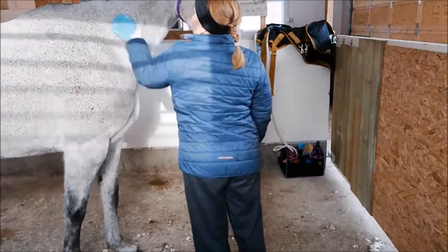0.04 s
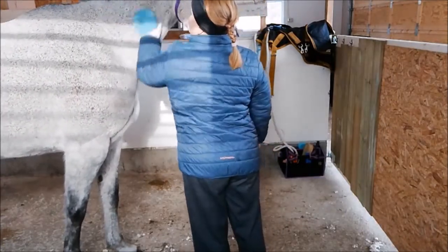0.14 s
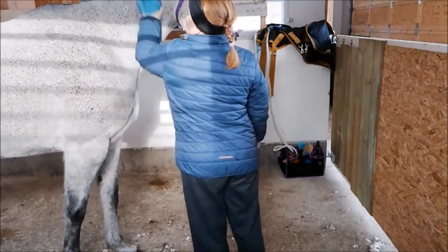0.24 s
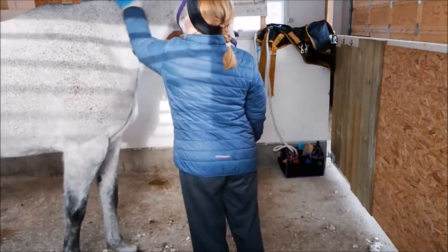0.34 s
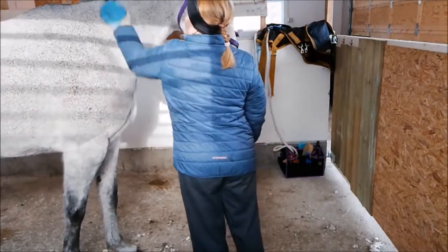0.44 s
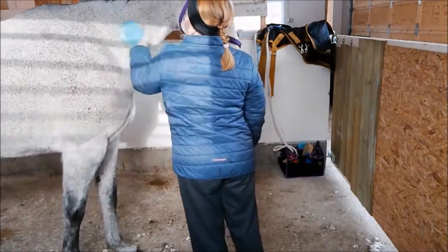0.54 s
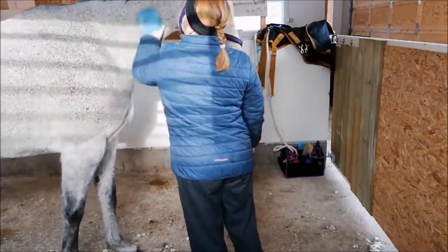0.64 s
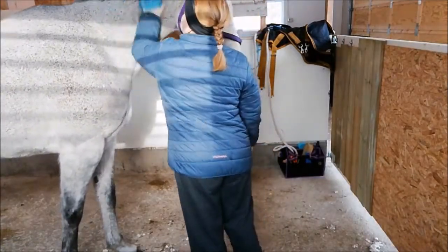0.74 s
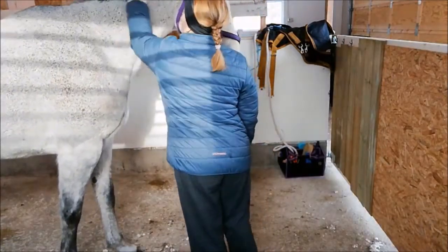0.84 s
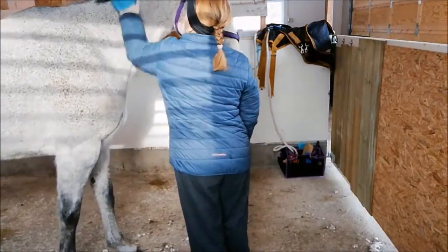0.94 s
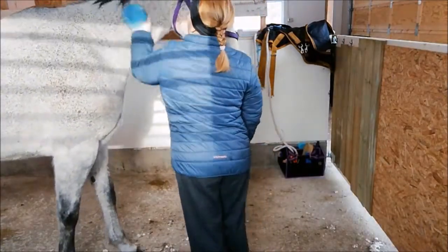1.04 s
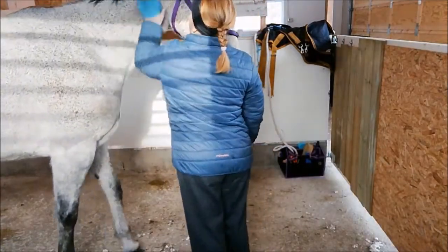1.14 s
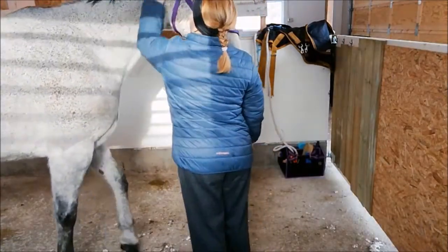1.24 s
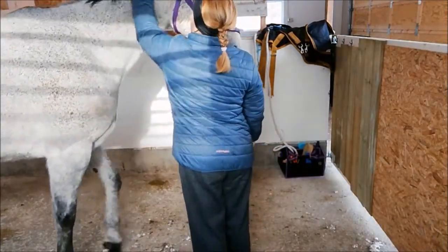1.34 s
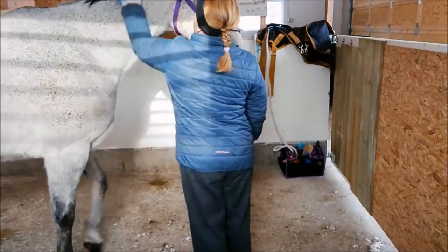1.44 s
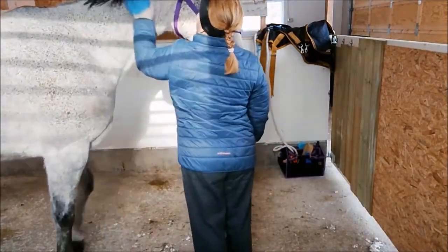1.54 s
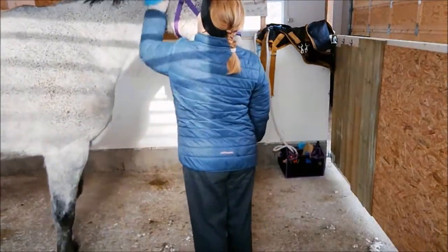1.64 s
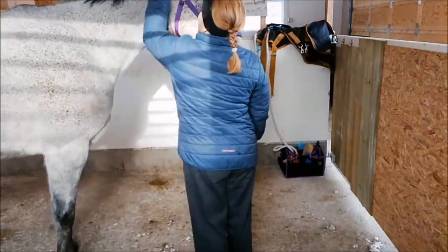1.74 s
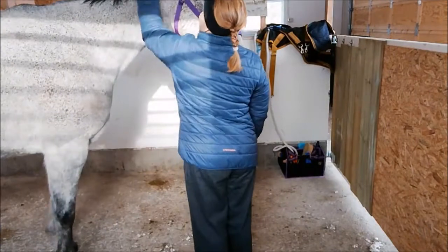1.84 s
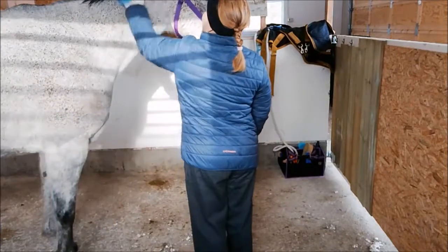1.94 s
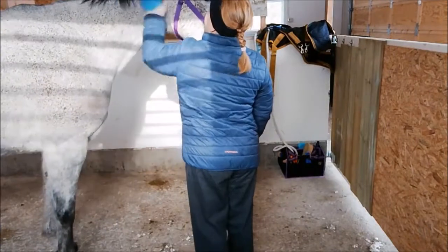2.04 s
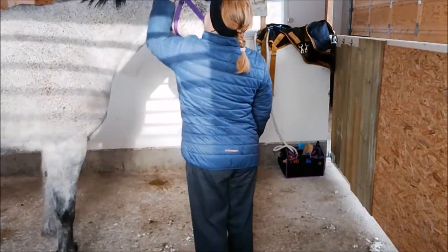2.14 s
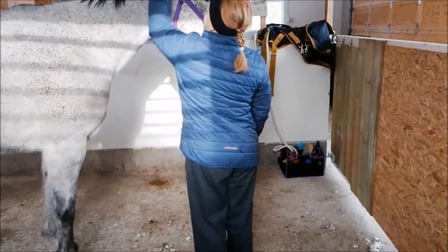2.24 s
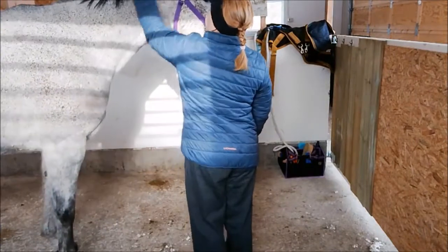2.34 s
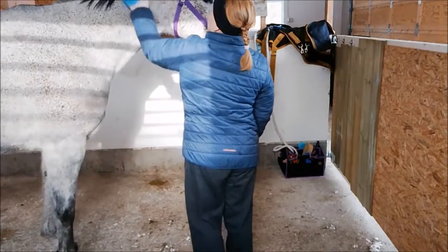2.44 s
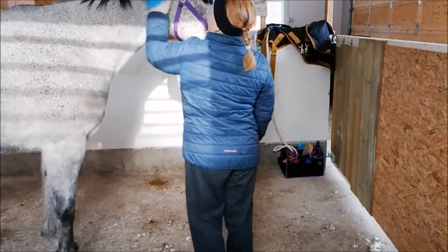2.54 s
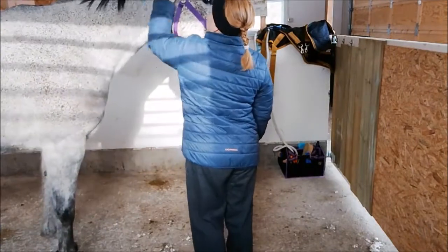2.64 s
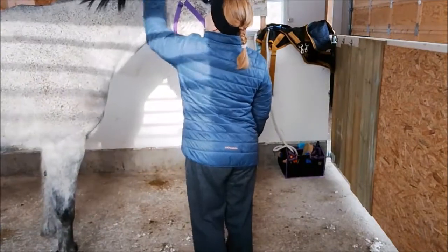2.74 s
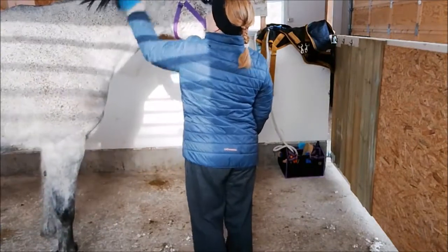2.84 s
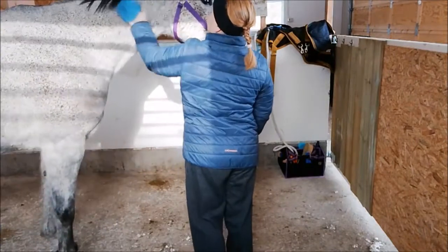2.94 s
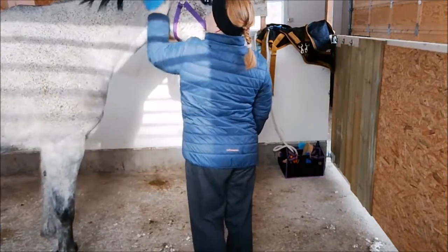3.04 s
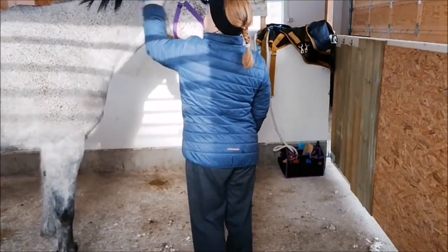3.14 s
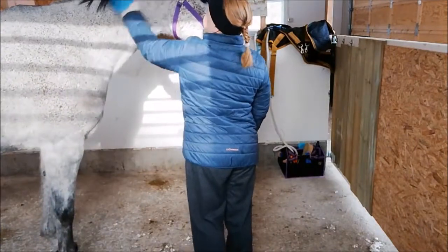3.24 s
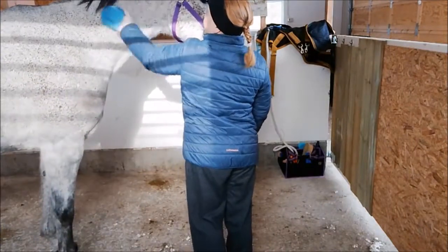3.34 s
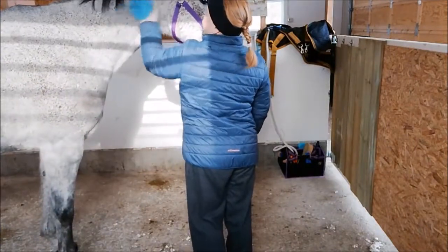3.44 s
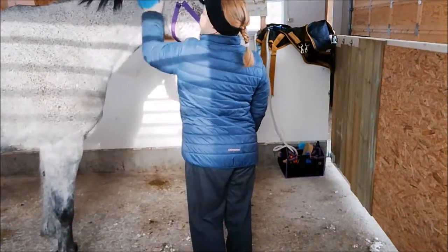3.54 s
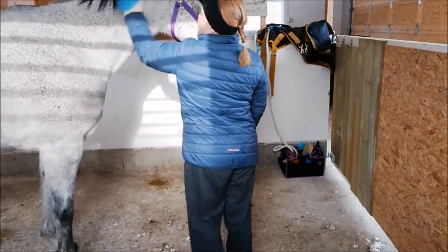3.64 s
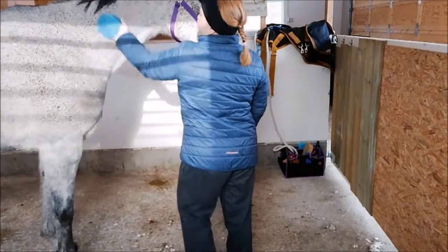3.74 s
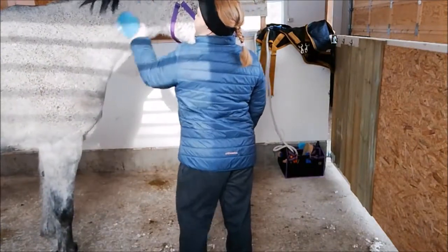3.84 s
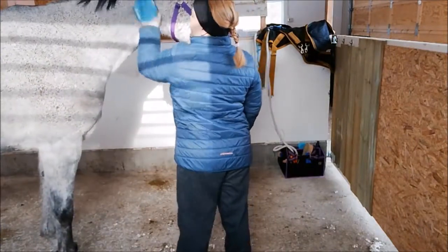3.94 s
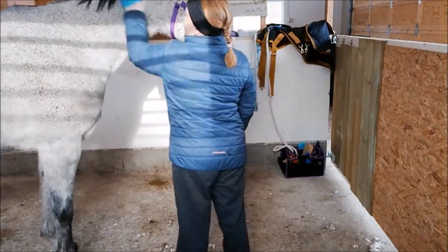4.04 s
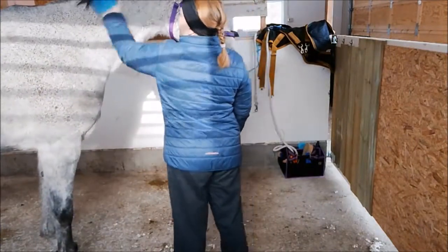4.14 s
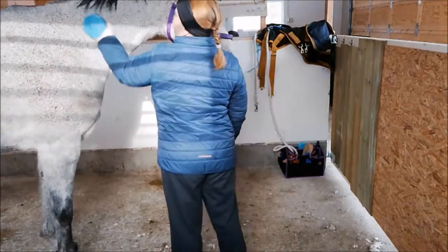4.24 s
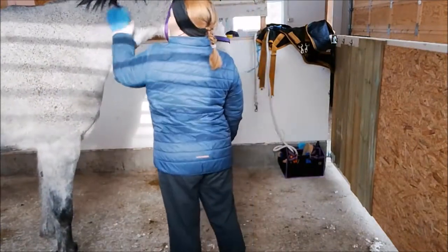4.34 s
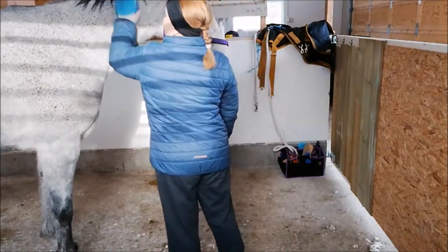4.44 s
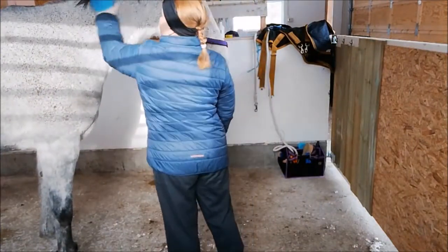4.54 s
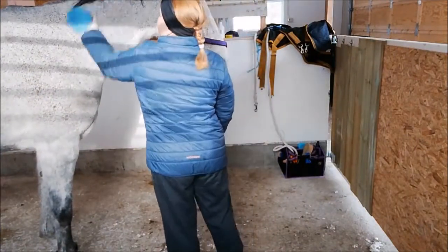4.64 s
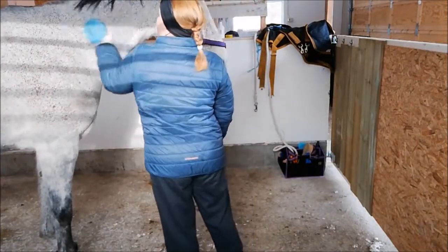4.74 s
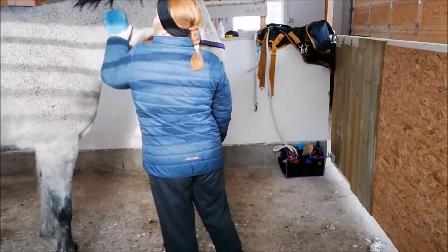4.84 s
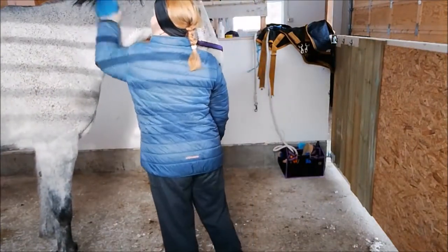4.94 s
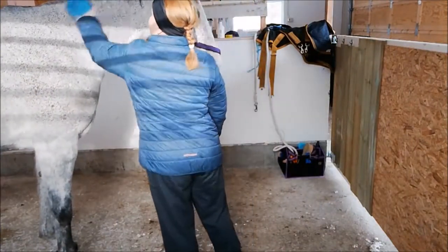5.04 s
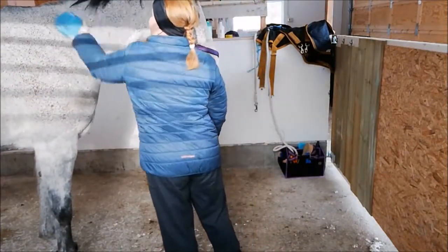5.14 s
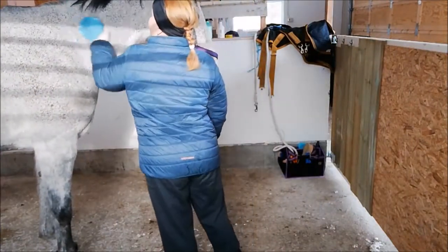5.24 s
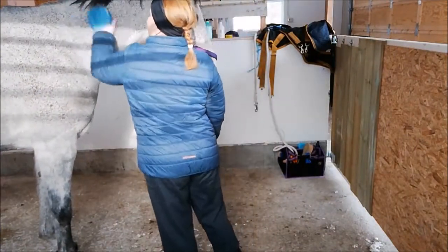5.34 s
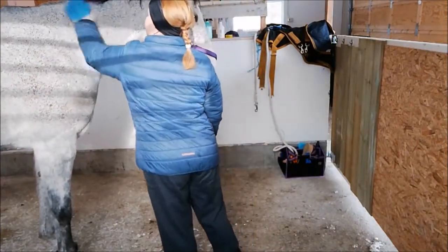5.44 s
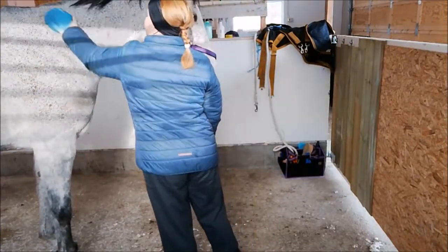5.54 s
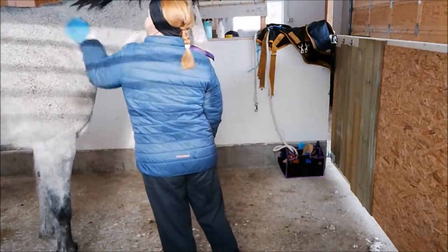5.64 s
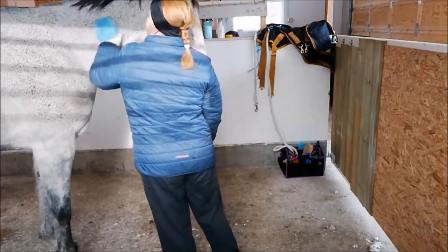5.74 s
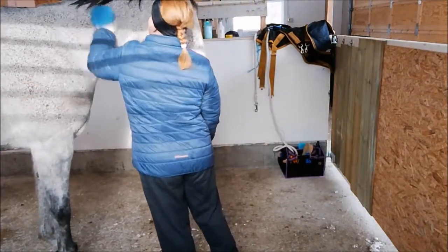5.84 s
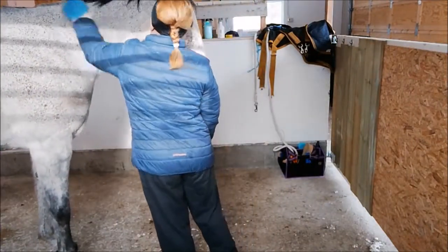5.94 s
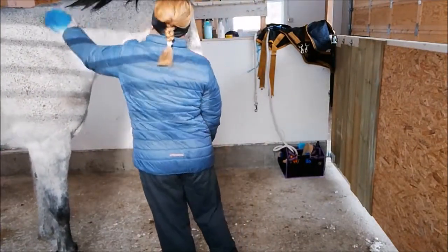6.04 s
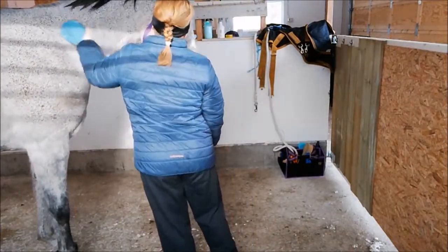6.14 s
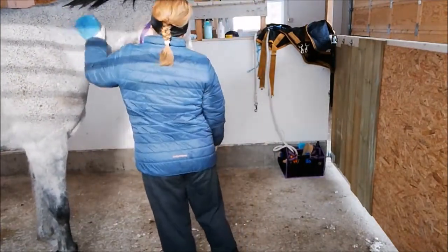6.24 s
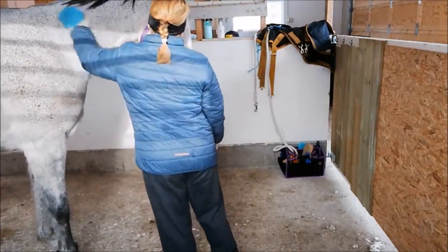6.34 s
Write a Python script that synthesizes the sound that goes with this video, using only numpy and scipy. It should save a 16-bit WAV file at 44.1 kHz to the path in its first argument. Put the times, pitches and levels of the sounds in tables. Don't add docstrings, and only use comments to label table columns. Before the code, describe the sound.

In a quiet stable, quiet hissing brush strokes continue steadily; early on, a hoof scrapes over grit and lands with a booming thud.

```python
import sys
import numpy as np
from scipy import signal
from scipy.fft import rfft, irfft, next_fast_len
from scipy.io import wavfile
from scipy.ndimage import uniform_filter1d, map_coordinates

SR = 44100
rng = np.random.default_rng(int(sys.argv[2]) if len(sys.argv) > 2 else 0)


def wav_out(sig):
    wavfile.write(sys.argv[1], SR, np.round(np.clip(np.atleast_2d(sig).T, -1, 1) * 32767).astype(np.int16))


def field_ratio(decibels):
    return 10 ** (np.asarray(decibels, dtype=float) / 20)


N = 281358


def unit(x):
    return x / np.sqrt(np.mean(x ** 2) + 1e-20)


def along(points, hz):
    f, value = np.transpose(points)
    return np.interp(np.log(hz + 1), np.log(f + 1), value)


def wobble(rate):
    knots = rng.standard_normal(int(N * rate / SR) + 4)
    return map_coordinates(knots, [np.arange(N) * rate / SR])


def filtered(x, response):
    m = next_fast_len(x.shape[-1] + 8192)
    hz = np.fft.rfftfreq(m, 1 / SR)
    return irfft(rfft(x, m) * response(hz), m)[..., :x.shape[-1]]


def coloured(x, spectrum):
    return unit(filtered(x, lambda hz: field_ratio(along(spectrum, hz))))


# (f/Hz, likeness from -1 to 1)
ALIKE = [(60, .92), (130, .95), (290, .75), (640, -.37), (1100, .2), (1800, 0), (16000, 0)]


def spread(pair):
    def mid_and_side(hz):
        angle = np.arccos(np.clip(along(ALIKE, hz), -1, 1)) / 2
        return np.array([np.cos(angle), np.sin(angle)])

    mid, side = filtered(pair, mid_and_side)
    return np.array([mid + side, mid - side])


def slips(spiky_db, patchy_db, channels=2):
    size = field_ratio(spiky_db * wobble(700))
    z = signal.stft(size * rng.standard_normal((channels, N)), nperseg=512)[2]
    patches = uniform_filter1d(rng.standard_normal(z.shape[1:]), size=5, axis=0)
    patches = uniform_filter1d(patches, size=12, axis=1)
    return signal.istft(z * field_ratio(patchy_db * unit(patches)), nperseg=512)[1][:, :N]


def dying(life, seconds):
    noise = rng.standard_normal((2, round(seconds * SR)))
    hz, t, z = signal.stft(noise, SR, nperseg=256)
    fade = field_ratio(-60 * t / along(life, hz)[:, None])
    return spread(signal.istft(z * fade, SR, nperseg=256)[1])


def ring(modes, t):
    return sum(field_ratio(db - 60 * t / t60) * np.sin(2 * np.pi * hz * t) for hz, db, t60 in modes)


def onset(t, rise_s):
    return (1 - np.exp(-t / rise_s)) ** 2


# (f/Hz, level/dB)
AIR = [(59, -16), (100, -5), (177, -4), (265, -4), (347, -10.5), (433, -13), (790, -14), (1100, -8),
       (1430, -33.5), (2420, -120)]
# (f/Hz, level/dB)
SWAY = [(12, -35), (20, 1), (54, 4.5), (107, -10), (120, -8), (160, -36), (260, -120)]
# (f/Hz, level/dB)
HISS = [(590, -44), (1000, -17.5), (1480, 2.5), (1760, -10.5), (5170, -7), (10200, -23), (15700, -19)]
# (t/s, width/s, level/dB)
LURCH = (6.9, 0.12, 8)


def air():
    rumble_db, murmur_db, mic_hiss_db = -75.5, -73.5, -66.5
    stir = slips(spiky_db=0.75, patchy_db=3.0)
    lurch_s, width_s, lurch_db = LURCH
    swell_db = lurch_db * np.exp(-((np.arange(N) / SR - lurch_s) / width_s) ** 2)
    rumble = field_ratio(rumble_db + swell_db + 1.9 * wobble(6)) * coloured(stir, SWAY)
    murmur = field_ratio(murmur_db + 2.2 * wobble(6.5)) * coloured(stir, AIR)
    return spread(rumble + murmur + field_ratio(mic_hiss_db) * coloured(stir, HISS))


# (f/Hz, t60/s)
WALLS = [(120, 0.43), (400, 0.252), (1200, 0.275), (4000, .18), (10000, 0.12)]


def walls(x):
    tail = dying(WALLS, 0.7)
    late = np.pad(x, (400, 0))[None]
    return signal.fftconvolve(late, tail / np.linalg.norm(tail[0]), axes=1)[:, :N]


# (t/s, level/dB, f/Hz)
TICKS = [
    (.757, -37, 880),
    (1.348, -26, 1494),
    (1.359, -17, 813),
    (3.990, -35, 2130),
    (6.085, -55, 400),
]


def stones():
    out, t = np.zeros((2, N + SR)), np.arange(SR // 2) / SR
    for s, db, hz in TICKS:
        tones = [(hz, db, .02), (2.3 * hz, db - 6.0, .012)]
        out[:, round(s * SR):][:, :len(t)] += onset(t, 0.00048) * ring(tones, t)
    return out[:, :N]


# (t/s, thud level/dB, crack over thud/dB, floor boom over thud/dB)
STAMPS = [
    (1.27, -44, 8, -12),
    (1.352, -10.5, -4, 1.5),
    (1.455, -36, -7, -6),
    (1.947, -53, 0, 10),
]
# (f/Hz, level/dB, t60/s)
HOOF_MODES = [(194, 12.5, .05), (330, -4, .08)]
# (f/Hz, level/dB, t60/s)
FLOOR_MODES = [(131, -14.5, .4), (140, -1, 0.3), (165.9, -11.5, 0.46), (208, -14.5, 0.5),
               (255.3, -14.5, 0.3235), (284, -14.5, 0.29)]
# (f/Hz, level/dB)
BOARDS = [(30, -49), (60, -22.5), (110, -5), (200, 6.5), (340, -1), (420, -24), (600, -58.5)]
# (f/Hz, level/dB)
CRACK = [(240, -42.5), (400, -12), (775, -2.5), (1070, -8), (1370, -6.5), (2170, -17.5), (2650, -16),
         (3090, -20), (3550, -22.5), (15800, -56)]
# (f/Hz, t60/s)
CRACK_LIFE = [(60, 1), (200, 0.2), (400, 0.47), (1000, .5), (2000, 0.5), (4000, 0.3), (8000, 0.22)]


def stamps():
    out, t = np.zeros((2, N + SR)), np.arange(SR // 2) / SR
    right_lag_s = .0003
    late = np.array([t, t - right_lag_s])
    for s, db, crack_db, boom_db in STAMPS:
        rattle = dying(CRACK_LIFE, 1.0)[:, :len(t)]
        boom = ring(FLOOR_MODES, late) + field_ratio(-23.5) * coloured(rattle, BOARDS)
        thud = onset(t, 0.0032) * ring(HOOF_MODES, late)
        thud = thud + field_ratio(boom_db) * onset(t, 0.014) * boom
        snap = onset(t, 0.0024) * (1 + 0.53 * field_ratio(-60 * t / .1))
        crack = field_ratio(crack_db - 18.5) * snap * coloured(rattle, CRACK)
        out[:, round(s * SR):][:, :len(t)] += field_ratio(db) * (thud + crack)
    return out[:, :N]


# (start t/s, rise/s, hold/s, scrape level/dB, fade/dB a second)
DRAGS = [
    (.725, 0.11, .01, -31, 223),
    (0.978, 0.05, 0.045, -49, 157),
    (1.265, 0.0069, .02, -41, 146),
    (1.582, 0.02, 0.069, -38.5, 197),
    (1.94, .02, 0.011, -61.5, 250.5),
    (3.982, 0.0064, 0.045, -55, 216.5),
    (6.082, 0.0055, .04, -63, 246.5),
]
# (floor boom over scrape/dB, hoof drone/dB, grit/dB, share singing in horn)
WEIGHT = [(-24.5, -5.5, -7.5, .15), (-8, -2.5, 1, .5), (-13, -6, -6, .5), (-3, -5.5, 1.5, 1.2),
          (9.5, -7, -9.5, .4), (-12, -5.5, 8, .2), (-16, -10, -6.5, .4)]
# (f/Hz, width/Hz, level/dB)
HORN = [(457, 12, 18), (640, 39.84, -4), (870, 25, 4), (1087.5, 16.7, 19), (2065, 54, 8), (2670, 17, 2),
        (3830, 40, 9.5)]
# (f/Hz, level/dB)
SCRAPE = [(240, -43), (400, -20), (619, -2.5), (921, -7), (1060, -6.5), (1200, -6.5), (1900, -22),
          (2470, -46.5), (4180, -120)]
# (f/Hz, level/dB)
BOOM = [(29, -49), (50, -16), (75, -21.5), (113, 3), (170, -13), (220, -35), (370, -120)]
# (f/Hz, level/dB)
RUMBLE = [(94, -37.5), (160, -4.5), (210, 5.5), (370, 3), (404, -25), (450, -16.5), (580, -42), (990, -120)]
# (f/Hz, level/dB)
GRIT = [(1000, -38.5), (1700, -12), (2070, -4.5), (3300, -7.5), (4790, -9.5), (7280, -15), (9030, -33.5),
        (15100, -39), (15800, -39.5)]


def horn(hz):
    tones = (field_ratio(db) * 1j * hz * w / (c * c - hz * hz + 1j * hz * w) for c, w, db in HORN)
    return sum(tones) / 2


def drags():
    start, rise, hold, scrape_db, fade = np.transpose(DRAGS)[:, :, None]
    t = np.arange(N) / SR - start
    *over_db, sing = np.transpose(WEIGHT)
    boom, drone, grit = field_ratio(over_db)

    def slide(haste, lead=1):
        fading = haste * fade * np.clip(t - rise - hold, 0, 1)
        return np.clip(t / rise, 0, 1) ** lead * field_ratio(scrape_db - fading)

    push = slide(0.79)
    lean = slide(1, lead=.6)
    grind = spread(slips(spiky_db=2.0, patchy_db=1.53))
    singing = sing @ push / (push.sum(0) + 1e-9)
    crunch = grind + singing * filtered(grind, horn)
    layers = push.sum(0) * coloured(crunch, SCRAPE)
    layers += boom @ push * coloured(crunch, BOOM)
    layers += drone @ lean * coloured(crunch, RUMBLE)
    layers += grit @ slide(1.21) * coloured(crunch, GRIT)
    return field_ratio(0.68 * wobble(60)) * layers


# (t/s, level/dB, length/s)
FLICK = (6.083, -51, 0.069)
# (f/Hz, level/dB)
WHISK = [(2060, -43), (3500, -11.5), (5710, 2.5), (9730, -9), (14600, -10.5), (16000, -21)]


def flick():
    s, db, length = FLICK
    t = np.arange(N) / SR - s
    fade = field_ratio(-40 * np.clip(t, 0, 1) - 470 * np.clip(t - length, 0, 1))
    shape = np.clip(t / 0.0028, 0, 1) * fade
    return field_ratio(db) * shape * spread(coloured(slips(spiky_db=2.0, patchy_db=0.5), WHISK))


# (turn t/s, hiss level at turn/dB, rub level/dB, bristle hiss level/dB, coat resonance f/Hz)
OPENING = [(-0.02, -61, -67.5, -63, 1399), (0.09, -64, -61.5, -59, 1560), (0.3, -57, -66.5, -53.5, 1585),
           (0.54, -61, -62, -57.5, 1450), (0.96, -63, -57, -61.5, 1500), (1.21, -62, -57, -56, 1488),
           (1.45, -60, -69, -54.5, 1583)]
# (turn t/s, hiss level at turn/dB, rub level/dB, bristle hiss level/dB, coat resonance f/Hz)
STROKES = [(1.85, -68, -68, -60.5, 1600), (2.049, -69, -63.5, -59.5, 1600), (2.33, -63, -64.5, -60, 1560),
           (2.54, -66.5, -62, -59, 1900), (2.78, -71.5, -57, -58, 1850), (3.021, -68.5, -60, -57.5, 1760),
           (3.22, -82, -55.5, -56.5, 1700), (3.44, -74.5, -56, -54.5, 1620), (3.664, -75, -52.5, -56, 1401),
           (3.882, -66, -55.5, -58.5, 1900), (4.08, -54.5, -60.5, -59, 1800),
           (4.369, -72, -59.5, -59.5, 1650), (4.579, -65.5, -67, -61, 1800),
           (4.82, -67.5, -60.5, -60, 1500), (5.03, -63.5, -64, -60.5, 2000),
           (5.269, -67, -62.5, -60.5, 1520), (5.48, -62.5, -68.5, -61.5, 1500), (5.69, -72, -56, -57, 1500),
           (5.94, -64, -59, -58, 1850), (6.17, -71, -57, -58, 1480)]
# (t/s, hiss level/dB)
LAST_TURN = (6.39, -70.5)


def hand():
    full_stroke = 0.64
    glide_hz = 150.1
    rub_at_turn_db = -4
    turn, rest_db, rub_db, hiss_db, coat_hz = np.transpose(OPENING + STROKES)
    turn, rest_db = np.append(turn, LAST_TURN[0]), np.append(rest_db, LAST_TURN[1])
    t = np.arange(N) / SR
    k = np.clip(np.searchsorted(turn, t) - 1, 0, len(rub_db) - 1)
    u = np.clip((t - turn[k]) / np.diff(turn)[k], 0, 1)
    speed = np.abs(np.sin(np.pi * u)) ** full_stroke
    rest = np.interp(t, turn, rest_db)

    def swell(low, top):
        return low + (top[k] - low) * speed

    return swell(rest + rub_at_turn_db, rub_db), swell(rest, hiss_db), coat_hz[k] + glide_hz * (u - .5)


# (f/Hz, level/dB)
COAT = [(350, -58.5), (600, -21.5), (850, -21.5), (1300, -1.5), (2100, -3), (3200, -11.5), (4160, -32),
        (7000, -120)]
# (f/Hz, level/dB)
BRISTLE = [(1530, -18.5), (2600, -7.5), (2960, -9.5), (3570, -3), (4150, -6), (4950, -1), (9000, -11.5),
           (11700, -36.5), (19800, -120)]
# (f/Hz, level/dB)
DUST = [(4700, -24), (8000, -17), (10500, 0), (13000, -1.5), (15700, -2.5)]


def brush():
    pat_db = -24
    rub_db, hiss_db, coat_hz = hand()
    comb = slips(spiky_db=1.0, patchy_db=2.2)
    hz, t, z = signal.stft(coloured(comb, COAT), SR, nperseg=512)
    centre = np.interp(t, np.arange(N) / SR, coat_hz)
    hollow = 1
    for k, lift in [(1, 1.9), (1.5, .35)]:
        hollow = hollow + lift / (1 + ((hz[:, None] - k * centre) / 90) ** 2)
    rub = unit(signal.istft(z * hollow, SR, nperseg=512)[1][:, :N])
    rub = field_ratio(rub_db) * (rub + field_ratio(pat_db) * coloured(comb, AIR))
    hiss = field_ratio(hiss_db) * coloured(comb, BRISTLE)
    dust_db = -73 + .8 * (hiss_db + 64.5)
    dust = field_ratio(dust_db) * coloured(rng.standard_normal((2, N)), DUST)
    return spread(field_ratio(.8 * wobble(25)) * (rub + hiss + dust))


def scene():
    hoof = drags()
    return air() + hoof + field_ratio(-6.5) * walls(hoof[0]) + stones() + stamps() + flick() + brush()


def roll_off(x):
    return signal.sosfilt(signal.butter(12, 16110, fs=SR, output="sos"), x)


# (f/Hz, left over right/dB)
LEAN = [(60, 3.5), (110, -1), (200, 2), (380, -1.5), (700, 2.5), (1290, -1.5), (2380, 2.5), (4400, 3),
        (8120, -3.5), (15000, -1)]


def record(dry):
    top_hz = 15770

    def microphones(hz):
        bass_cut = (1j * hz / (18 + 1j * hz)) ** 2
        lean_db = along(LEAN, hz) * np.array([[.5], [-.5]])
        return bass_cut * (hz < top_hz) * field_ratio(lean_db)

    return roll_off(filtered(dry, microphones))


dry = scene()
out = record(dry)
wav_out(out)
```